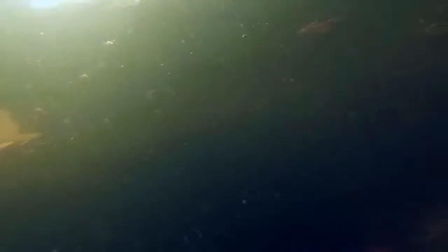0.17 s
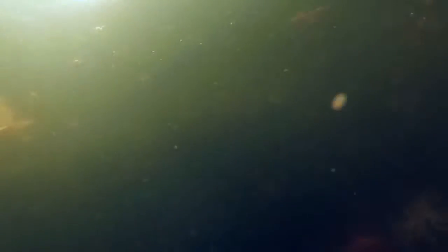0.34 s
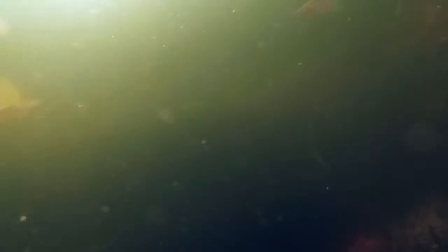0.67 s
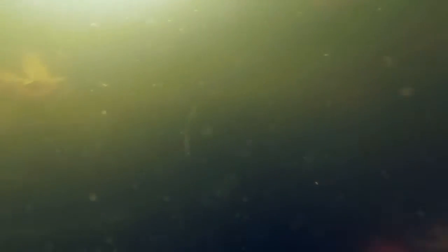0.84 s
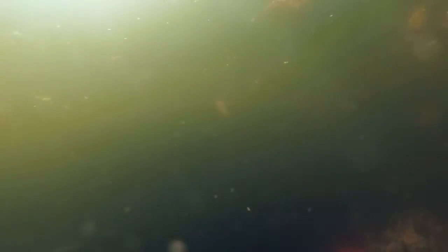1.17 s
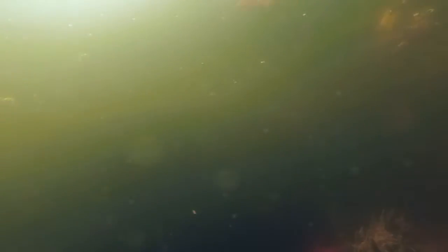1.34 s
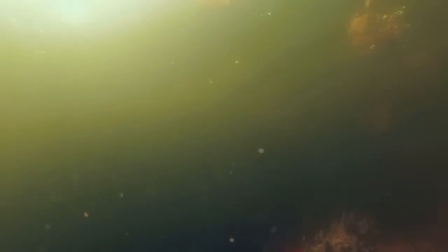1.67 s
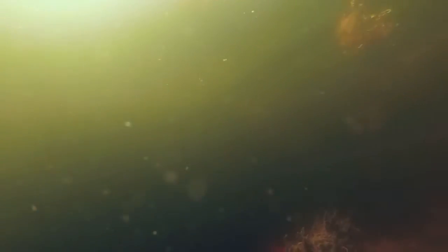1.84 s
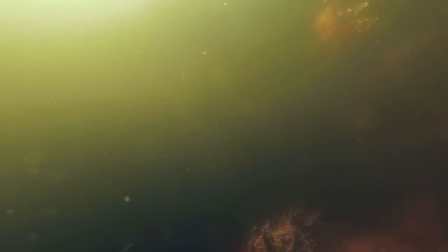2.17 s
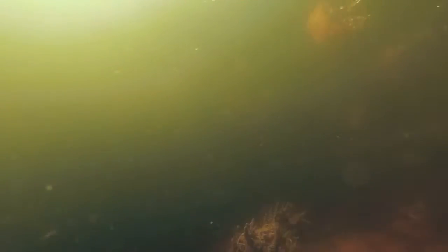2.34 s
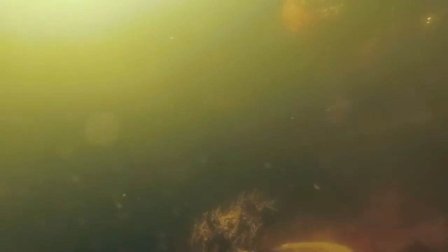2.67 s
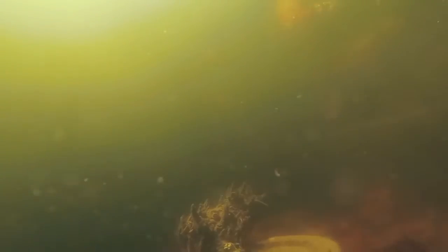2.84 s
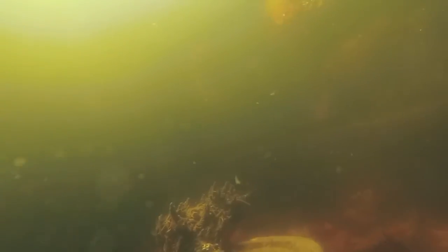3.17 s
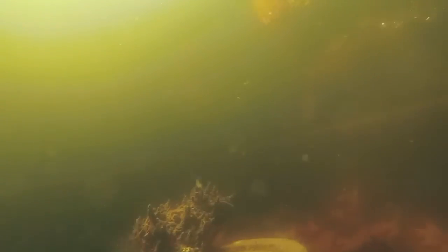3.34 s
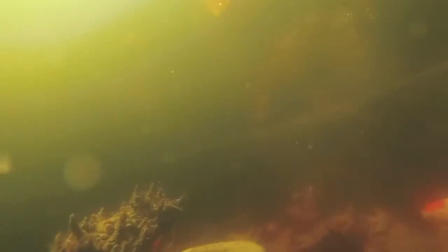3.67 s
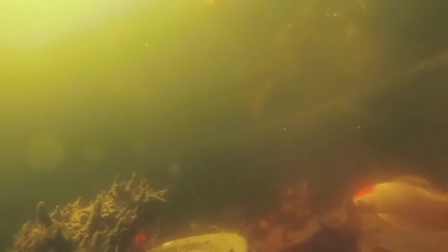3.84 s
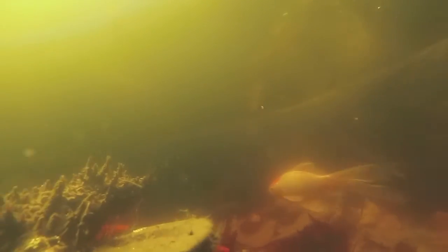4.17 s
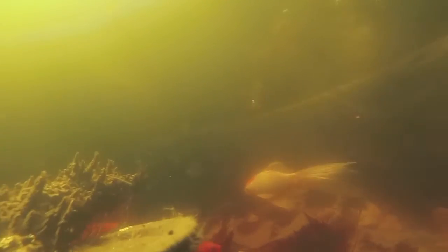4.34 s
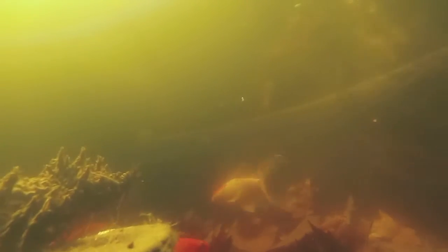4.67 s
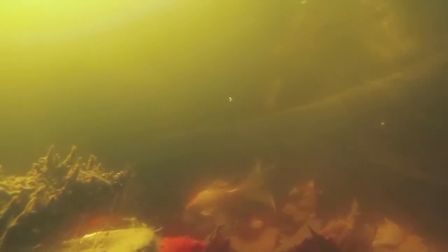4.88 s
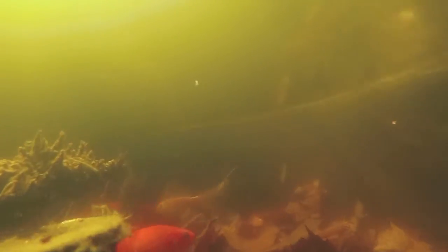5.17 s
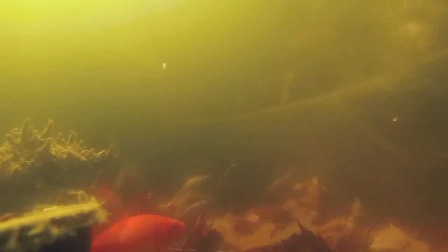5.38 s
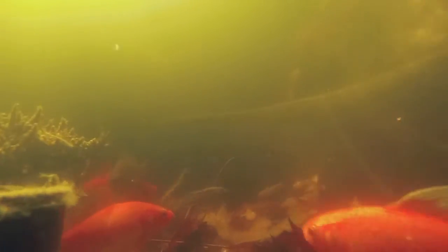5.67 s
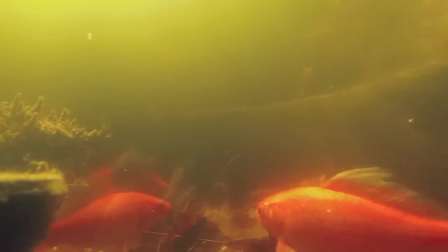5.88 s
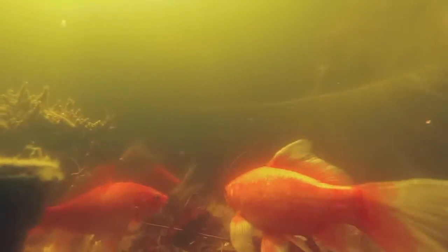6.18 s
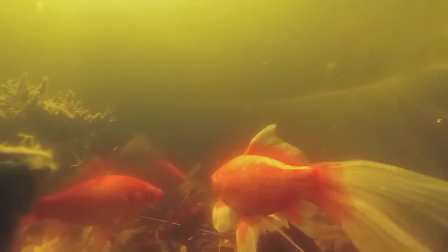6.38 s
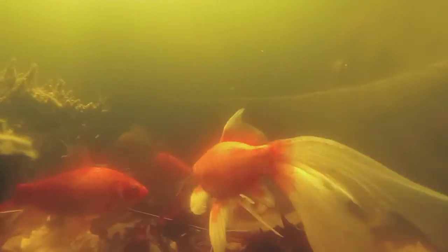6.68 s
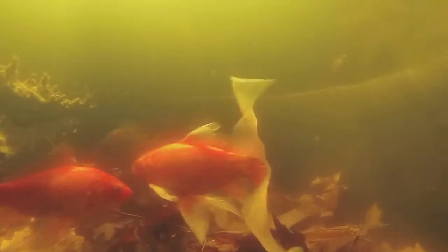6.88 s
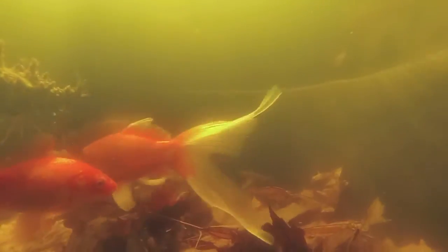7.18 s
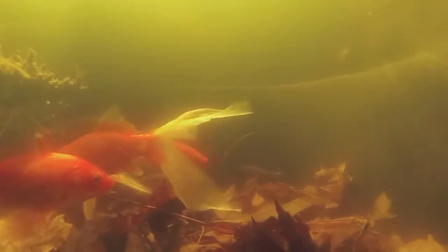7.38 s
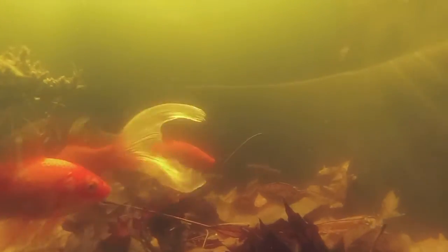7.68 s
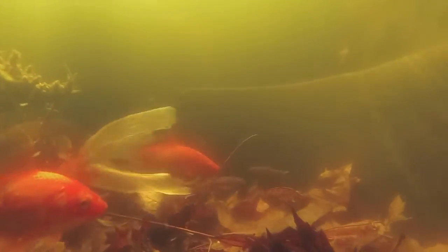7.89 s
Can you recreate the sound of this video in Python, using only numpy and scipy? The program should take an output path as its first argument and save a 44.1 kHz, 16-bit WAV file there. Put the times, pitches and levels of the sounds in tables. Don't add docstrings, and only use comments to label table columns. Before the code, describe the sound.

A microphone sealed inside a housing is lowered into a garden pond. From 0 to 1 second trapped air escapes in hollow mid-pitched glugs, low gulps and a stream of small bubbles, with a deep shuddering lurch around 0.8. The water settles into a muffled gurgle with fine crackle, low flow rumble and the steady hum of a mains pump buzzing the shell. A round pop comes at about 1.9. Near 3.0 the pole knocks heavily with a deep thump and gritty grinding; more knocks and a short bounce follow from 3.3 to 3.6, with a tiny snap between. Low surges pass around 3.9 to 4.4, with the hardest knock at 4.1. Weed drags and squeaks faintly at 4.6 to 4.9, and a last knock rings at 5.1. The hum then swells over sparse ticks, until weed brushes and a loose latch chatters lightly from 7.5 to 8.

```python
import sys
import numpy as np
from scipy import signal
from scipy.io import wavfile
from scipy.ndimage import uniform_filter1d

SR = 44100
rng = np.random.default_rng(int(sys.argv[2]) if len(sys.argv) > 2 else 0)


def transcribe(u):
    v = np.clip(np.atleast_2d(u).T, -1, 1)
    q = np.round(v * 32767).astype(np.int16)
    wavfile.write(sys.argv[1], SR, q)


def gain_from_db(level_db):
    decades = np.asarray(level_db, float) / 20
    return 10 ** decades


N = 353682


def unit(x):
    return x / np.sqrt(np.mean(x ** 2))


def read(rows):
    s, *columns = np.transpose(rows)
    return np.array([np.interp(np.arange(N) / SR, s, c) for c in columns])


def bandpass(x, order, low_hz, top_hz):
    return signal.sosfilt(signal.butter(order, [low_hz, top_hz], "band", fs=SR, output="sos"), x)


def modes(excite, table, order=2):
    out = 0
    for hz, width, db in table:
        mode = bandpass(excite(), order, hz - width / 2, hz + width / 2)
        out = out + gain_from_db(db) * unit(mode)
    return unit(out)


def walk(rate):
    k = int(SR / rate)
    held = np.repeat(rng.standard_normal(N // k + 1), k)
    return uniform_filter1d(uniform_filter1d(held, k), k)[:N]


def grains(per_s, spread_db):
    at = rng.random(1000)
    size = np.minimum(rng.exponential(size=1000), 2.6)
    keep = int(per_s * N / SR)
    out = np.zeros(N)
    out[(at[:keep] * N).astype(int)] = gain_from_db(spread_db * size[:keep])
    return unit(out)


def swell(rise, t60):
    rise, t60 = max(rise, 1 / SR), max(t60, 1e-3)
    t = np.arange(int((rise + t60) * SR)) / SR
    onset = np.sin(np.pi / 2 * np.minimum(t / rise, 1)) ** 2
    return t, onset * gain_from_db(-60 * np.maximum(t - rise, 0) / t60)


def add(out, s, x):
    i = int(s * SR)
    out[i:i + len(x)] += x[:N - i]


def ring(db, hz, rise, t60, glide=0.):
    t, env = swell(rise, t60)
    turns = hz * (t + glide * t ** 2 / (2 * t[-1]))
    return gain_from_db(db) * env * np.sin(2 * np.pi * turns)


def burst(db, rise, t60, low_hz, top_hz):
    env = swell(rise, t60)[1]
    n = len(env)
    grain_db = 3.5 * np.repeat(rng.standard_normal(n // 128 + 1), 128)[:n]
    grit = rng.standard_normal(n) * gain_from_db(grain_db)
    return gain_from_db(db) * env * unit(bandpass(grit, 3, low_hz, top_hz)) / 2


def duck():
    # (time [s], gain change [dB])
    loud_moments = [
        (0.821, -6),
        (.93, -5),
        (2.96, -10),
    ]
    attack_s, hold_s, recover_s = 0.055, 0.083, 0.39
    t = np.arange(N) / SR
    knees = np.cumsum([0, attack_s, hold_s, recover_s])
    return sum(np.interp(t - s, knees, [0, db, db, 0]) for s, db in loud_moments)


def rumble(depth):
    # (frequency [Hz], level [dB per Hz])
    spectrum = [(15, -8.5), (65, -10), (144, -15), (167, -18), (247, -20), (292, -37), (420, -40),
                (550, -64)]
    hump_hz, shallow_db, deep_db = 64.6, -5, 2
    hz_points, db_points = np.transpose(spectrum)
    out = 0
    for hz in 20 * 2 ** np.arange(0, 4.5, .5):
        db = np.interp(np.log(hz), np.log(hz_points), db_points)
        db = db + 10 * np.log10(hz)
        hump = np.exp(-(np.log2(hz / hump_hz) / 0.39) ** 2)
        db = db + (shallow_db + (deep_db - shallow_db) * depth) * hump
        band = modes(lambda: rng.standard_normal(N), [(hz, hz / 3, 0)])
        out = out + gain_from_db(db + 3.2 * walk(5.4)) * band
    start_db, grows_s = -5, 0.91
    level_db = -31.5 + start_db * np.maximum(1 - np.arange(N) / SR / grows_s, 0)
    return gain_from_db(level_db) * unit(out)


def pump(stir, depth):
    # (time [s], beat level [dB], 2nd multiple level [dB])
    main_lines = [(0.0, -35.5, -38.5), (0.4, -30.5, -34.5), (0.7, -32, -30), (0.95, -13.5, -28.5),
                  (1.15, -27.5, -34.5), (1.7, -26, -35.5), (2.1, -28, -34.5), (2.9, -25, -36.5),
                  (3.25, -23.5, -35), (3.65, -21.5, -41), (4.05, -25, -37.5), (4.5, -34.5, -31),
                  (5.0, -26, -32), (5.5, -19.5, -32), (6.2, -16.5, -36.5), (7.4, -19, -39),
                  (8.02, -22, -38.5)]
    # (multiple of the beat, index of line followed, level over it [dB])
    side_lines = [(2.5, 2, -7), (3.5, 2, -5), (4, 3, -1), (4.5, 3.5, -10.5), (6, 2.5, -13.5),
                  (6.5, 2.3, -18.5), (7.5, 2.6, -18.5)]
    beat_hz = 119.96
    third_db = -29.5 + 0.67 * stir - 12 * depth
    fifth_db = -28.5 + 0.84 * stir - 3.5 * depth
    odd_mains_db = -40.5 + 3 * depth
    db = [*read(main_lines), third_db, fifth_db, odd_mains_db]
    lines = list(zip((1, 2, 3, 5, 1.5), db))
    lines += [(k, db[int(line)] + rel_db) for k, line, rel_db in side_lines]
    phase = beat_hz * np.arange(N) / SR
    hum = 0
    for k, level_db in lines:
        lag = .45 * k ** 2
        hum = hum + gain_from_db(level_db + 1.05 * walk(25)) * np.cos(2 * np.pi * k * phase - lag)
    return np.sqrt(2) * hum, phase


def scrape():
    # (time [s], extra drive [dB], rise [s], hold [s], hiss level [dB])
    brushes = [
        (4.62, 4, 0.16, .08, -48.5),
        (7.5, 6.5, 0.041, .04, -59),
        (7.735, 5, 0.019, 0.028, -64),
        (7.8, 4, .02, .03, -64),
        (7.87, 4, .01, .03, -65),
        (7.917, 4, .008, 0.023, -62),
    ]
    release_s = .012
    t = np.arange(N) / SR
    leaves = unit(bandpass(rng.standard_normal(N), 5, 1000, 5300))
    drive_db, hiss_gain = 0, 0
    for s, extra_db, rise, hold, hiss_db in brushes:
        knees = np.cumsum([0, rise, hold, release_s + .6 * rise])
        shape = np.interp(t - s, knees, [0, 1, 1, 0])
        drive_db = drive_db + extra_db * shape
        hiss_gain = hiss_gain + gain_from_db(hiss_db) * shape
    return drive_db, hiss_gain * leaves * gain_from_db(4.0 * walk(90))


def water(phase, stir, depth):
    # (frequency [Hz], width [Hz], level [dB], extra level [dB per dB of stir])
    gurgle_modes = [(298, 152, -4.5, -0.09), (482, 110, -2, -0.19), (581.4, 92, -1.5, 0.1346),
                    (690, 144, -10.5, 0.25)]
    # (frequency [Hz], width [Hz], level [dB])
    shallow_modes = [(932, 230, -2.5), (1400, 320, -7), (1650, 346, -1.5), (2240, 162, 0.5),
                     (2395, 200, -5.5), (2834, 270, -8.5), (3165, 210, -9), (3585, 300, -14)]
    # (frequency [Hz], width [Hz], level [dB])
    deep_modes = [(1010, 460, -4), (1500, 880, -0.5), (2075, 450, -1.5), (2460, 130, -1.5),
                  (2780, 230, -2.5), (3150, 160, -6), (3610, 560, -4)]
    # (frequency [Hz], width [Hz], level [dB])
    fizz_modes = [(4000, 560, 1), (5050, 780, 1.5), (5800, 870, -3), (6850, 790, 0.5), (7730, 900, -6.5),
                  (9400, 1100, -5.5), (8500, 830, -14), (11000, 1600, -7), (13000, 2000, -11.5),
                  (14600, 1400, -14)]
    brush_db, hiss = scrape()
    stroke_strength = gain_from_db(3.7 * rng.standard_normal(int(phase[-1]) + 1))
    stroke = unit(stroke_strength[phase.astype(int)] * np.exp(-(phase % 1) / 0.31))
    ticks = grains(79, 5.0)

    def force(shake, shared, own, flicker_db):
        noise = rng.standard_normal(N) * gain_from_db(flicker_db * walk(35))
        return noise * (1 + shake * stroke) + shared * ticks + own * grains(30, 4.0)

    stirred_modes = [(hz, width, db + lean * (stir + 12)) for hz, width, db, lean in gurgle_modes]
    gurgle = modes(lambda: force(0.86, 0.063, .03, 1.3), stirred_modes)
    shallow = modes(lambda: force(1.4, 0.62, .15, 3.2), shallow_modes)
    deep = modes(lambda: force(0.38, 0.32, 0.17, 2.3), deep_modes)
    fizz = modes(lambda: force(0.42, 0.4, 0.6, 2.0), fizz_modes)
    rattle = np.sqrt(1 - depth) * shallow + np.sqrt(depth) * deep
    upper = signal.sosfiltfilt(signal.butter(3, 2100, "high", fs=SR, output="sos"), rattle)
    rattle = rattle + (gain_from_db(brush_db) - 1) * upper
    rattle_db = -38 + 0.4 * stir - 8.5 * depth
    fizz_db = -59.5 + 0.56 * brush_db
    return hiss + gain_from_db(-22 + stir) * gurgle + gain_from_db(rattle_db) * rattle + gain_from_db(fizz_db) * fizz


def surges():
    # (time [s], peak level [dB], frequency [Hz])
    pulses = [
        (.78, -22, 68),
        (2.929, -25, 72.6),
        (3.88, -19, 75.5),
        (4.02, -21, 63),
        (4.44, -22, 60.3),
        (5.85, -30, 55),
        (7.0, -30, 52),
    ]
    out = np.zeros(N)
    for s, db, hz in pulses:
        add(out, s, ring(db, hz, .05, 0.22, glide=-0.17))
    return out


def squeak():
    start_s, lasts_s = 4.82, .1
    out = np.zeros(N)
    for step in np.arange(0, lasts_s, .009):
        db = -46 + 3 * rng.standard_normal()
        hz = 1480 * (1 + 0.06 * rng.standard_normal())
        add(out, start_s + step, ring(db, hz, 0.0024, .03))
    return out


def latch():
    # (time [s], peak level [dB], frequency [Hz])
    strikes = [(7.529, -44, 2500), (7.543, -42, 2500), (7.558, -38, 2460), (7.718, -44, 2510),
               (7.751, -42, 2500), (7.758, -38, 2530), (7.768, -41, 2520), (7.776, -38, 2500),
               (7.808, -43, 2510), (7.8206, -41, 2500), (7.828, -41, 2490), (7.836, -42, 2500),
               (7.844, -44, 2510), (7.884, -40, 2490), (7.901, -42, 2500), (7.926, -37, 2440),
               (7.943, -36, 2470), (7.993, -45, 2480)]
    t60 = 0.024
    out = np.zeros(N)
    for s, db, hz in strikes:
        add(out, s, ring(db, hz, 0.0014, t60))
        add(out, s, burst(db - 4, .0015, .6 * t60, .85 * hz, 1.2 * 1.25 * hz))
    return out


def specks():
    # (time [s], peak level [dB], frequency [Hz])
    tick_events = [(0.0268, -33.5, 5740), (0.2094, -37.5, 7000), (0.3551, -39, 5410), (0.3716, -40, 5440),
                   (0.4599, -39, 6700), (0.4783, -43, 6070), (0.6454, -43, 5320), (0.7342, -37.5, 5460),
                   (0.8939, -45, 5400), (0.9577, -38, 5700), (1.0565, -45, 5200), (1.5155, -39, 5550),
                   (1.555, -42, 5520), (1.6551, -39, 6640), (1.7554, -43, 6500), (2.0133, -43, 6870),
                   (2.2383, -43, 6840), (2.395, -42, 6570), (2.587, -37, 7530), (2.7621, -38, 6640),
                   (2.8963, -42, 6840), (3.5073, -46, 6780), (3.5327, -45, 6760), (3.8415, -47, 6850),
                   (3.9418, -45, 6520), (3.9642, -46, 5550), (4.1967, -45, 5810), (4.4646, -47, 6770),
                   (4.4845, -37, 6600), (4.5414, -39, 6740), (4.5788, -36, 7610), (4.6332, -43, 6590),
                   (4.715, -45, 5430), (4.7869, -46, 5740), (4.958, -43, 7100), (5.0647, -48, 5200),
                   (5.3945, -45, 7480), (5.4858, -44, 6990), (5.5476, -44, 7060), (5.5925, -45, 6800),
                   (5.9153, -40, 5560), (5.9492, -45, 6290), (6.031, -44, 5300), (6.2929, -43, 5520),
                   (6.3393, -40, 10800), (6.4576, -45, 7190), (6.716, -46, 7180), (6.8592, -47, 5770),
                   (6.8906, -43, 6880), (7.0816, -44, 7180), (7.1919, -44, 6570), (7.3431, -43, 5200),
                   (7.382, -47, 6690), (7.5401, -41, 6660), (7.5571, -40, 6790), (7.7491, -44, 6760),
                   (7.7661, -39, 7260), (7.821, -38, 7680), (7.9153, -43, 7240), (7.9402, -43, 6970)]
    out = np.zeros(N)
    for s, db, hz in tick_events:
        add(out, s, burst(db - 1.0, 0.0026, .012, .9 * hz, 1.12 * hz))
    return out


def wallow():
    # (time [s], peak level [dB], rise [s], t60 [s])
    jolts = [
        (0.0, -31, .08, 2.5),
        (.29, -28, 0.07, 0.87),
        (.74, -21, 0.05, .4),
        (0.801, -6.5, 0.085, 1.4),
        (1.4, -32, 0.024, .8),
        (2.95, -19.5, 0.047, .45),
        (3.25, -27, 0.18, 0.73),
        (3.57, -25, 0.055, 1.8),
    ]
    # (time [s], frequency [Hz])
    swing_rate = [(.9, 22.2), (.97, 26)]
    drag_s, crest_s = .33, .881
    size = np.zeros(N)
    for s, db, rise, t60 in jolts:
        since, env = swell(rise, t60)
        add(size, s, gain_from_db(db) * env * np.exp(-(since / drag_s) ** 4))
    turns = np.cumsum(read(swing_rate)[0]) / SR
    angle = 2 * np.pi * (turns - turns[int(crest_s * SR)]) + np.pi / 2 + .15 * walk(12)
    swing = np.sin(angle) - .15 * np.cos(2 * angle) - 0.11 * np.sin(3 * angle)
    return np.sqrt(2) * size * swing


def grinding():
    # (time [s], peak level [dB], t60 [s], low edge [Hz], top edge [Hz])
    cracks = [(2.96, -13, 0.042, 900, 2000), (2.972, -9, 0.028, 700, 2400), (3.021, -51, 0.048, 1500, 4000),
              (3.06, -36, 0.014, 1100, 2200), (3.07, -33, 0.041, 700, 1900), (3.104, -31, .045, 700, 2600),
              (3.105, -38, .04, 2600, 6500), (0.025, -23, 0.019, 1900, 3900),
              (1.052, -28, .022, 1200, 3000), (1.054, -45, .018, 3000, 6200), (.734, -37, .016, 3500, 7000),
              (0.84, -32, 0.06, 910, 3480), (1.883, -32, .06, 930, 2700), (6.031, -35, .015, 2200, 5000),
              (2.587, -37, 0.027, 1200, 1800), (2.62, -29, 0.027, 780, 2000)]
    # (time [s], peak level [dB], rise [s], low edge [Hz], top edge [Hz])
    rubs = [(2.958, -22.5, 0.02, 2200, 5400), (2.959, -30, 0.024, 6700, 14000),
            (0.3, -28.5, .11, 760, 2350), (0.74, -33.5, 0.046, 2000, 3050), (0.8, -31.5, 0.024, 1400, 3300),
            (3.6, -30, 0.035, 650, 850), (4.061, -25.5, 0.011, 260, 410), (4.1, -35, 0.017, 1200, 1300),
            (3.3, -37, .02, 1700, 2430), (4.1, -30, 0.0092, 1800, 3600), (.918, -36, .01, 2400, 3700),
            (.985, -38, .015, 2400, 3700), (3.018, -52, .004, 4500, 7000), (3.06, -47, .004, 4000, 7000)]
    out = np.zeros(N)
    for s, db, t60, *band in cracks:
        add(out, s, burst(db, 0.17 * t60, t60, *band))
    for s, db, rise, *band in rubs:
        add(out, s, burst(db, rise, 1.1 * rise, *band))
    snap_s, snap_db, snap_decay_s = 3.4366, -19, .00007
    add(out, snap_s, -gain_from_db(snap_db) * np.exp(-np.arange(100) / SR / snap_decay_s))
    return out


def pole():
    # (time [s], peak level [dB], frequency [Hz], thump level [dB], upper ring level [dB])
    knocks = [
        (2.962, -11.5, 617, 3.5, -8),
        (3.106, -21.5, 596, -5, -10),
        (3.312, -10.5, 577, -5.5, -29),
        (3.515, -18, 621, -27, -15),
        (3.589, -14, 584, -6, -36),
        (3.604, -17, 605, -8, -40),
        (3.619, -21, 600, -12, -40),
        (3.644, -24, 590, 4, -32),
        (4.0632, -5, 605, -36, -20),
        (5.072, -10, 604, -26, -12.5),
    ]
    # (frequency [Hz], level [dB], t60 [s])
    thump_modes = [(148.8, 2.5, 0.43), (203.4, -2, 0.092), (293, -4, 0.18)]
    # (frequency [Hz], level [dB], t60 [s])
    upper_modes = [(1225, -6.5, .03), (1473, 6.5, 0.026), (2330, -7, 0.025), (2690, -6, 0.022)]
    t60 = 0.07
    out = np.zeros(N)
    for s, db, hz, thump_db, upper_db in knocks:
        add(out, s, ring(db - 3.0, hz, 0.0038, t60))
        add(out, s, ring(db - 14.5, 1.24 * hz, 0.0037, 1.23 * t60))
        for table, rel_db in ((thump_modes, thump_db), (upper_modes, upper_db)):
            for mode_hz, mode_db, mode_t60 in table:
                struck_hz = mode_hz * (1 + 0.0091 * rng.standard_normal())
                add(out, s, ring(db + rel_db + mode_db - 5.0, struck_hz, 0.0022, mode_t60))
    return out


def swarm():
    ends_s, low_hz, octaves = 1.0, 1000, 2.4
    out = np.zeros(N)
    for when, pitch, size in rng.random((90, 3)):
        hz = low_hz * 2 ** (octaves * pitch)
        db = -33.5 - 5 * octaves * pitch - 2.5 * np.log(size + .1)
        add(out, when * ends_s, ring(db, hz, 0.00046, 11 / hz, glide=.12))
    return out


def bubbles():
    # (time [s], peak level [dB],
    # frequency [Hz])
    short_rings = [(.01, -25.5, 3360), (0.026, -18.5, 1400), (.028, -24, 2100), (.083, -23, 1650),
                   (0.134, -20.5, 1690), (0.164, -21.5, 1400), (.208, -21.5, 1260), (0.356, -23, 1500),
                   (0.396, -27, 2360), (.538, -33, 2970), (0.644, -25, 2310), (.706, -8, 1650),
                   (0.735, -32.5, 4500), (0.772, -28, 1990), (0.844, -25, 1650), (1.0533, -21.5, 2130),
                   (1.057, -43, 4080), (1.077, -29, 1820), (1.883, -38, 1650), (2.973, -20, 1900),
                   (2.975, -20, 2160), (2.961, -21, 1400), (2.974, -21, 1050), (2.966, -25, 2900),
                   (4.141, -22.5, 2980), (4.142, -26.5, 1560), (4.145, -27.5, 2350), (4.485, -34.5, 2530),
                   (4.915, -38, 1560), (5.37, -39, 2500), (6.083, -40, 3800), (6.29, -46, 4200),
                   (6.332, -41.5, 4000)]
    rise, t60 = 0.0015, 0.023
    out = np.zeros(N)
    for s, db, hz in short_rings:
        add(out, s, ring(db, hz, rise, t60, glide=0.058))
        add(out, s, ring(db - 7.5, 0.65 * hz, rise / 2, t60 / 2))
        add(out, s, burst(db - 9.5, 0.0009, 0.022, 0.59 * hz, 1.38 * hz))
    return out


def air():
    # (time [s], peak level [dB], frequency [Hz], rise [s])
    pockets = [(.132, -18.5, 557, 0.016), (.158, -15, 600, 0.0096), (.222, -22, 597, 0.012),
               (.392, -15, 602, 0.026), (.262, -6.5, 598, 0.011), (.312, -18, 589, .008),
               (.36, -13, 584, 0.019), (.484, -16.5, 576, 0.026), (.529, -18.5, 591, 0.0099),
               (.605, -16, 565, 0.0082), (4.446, -31, 540, 0.0044), (5.216, -35, 500, .004),
               (5.512, -35, 597, 0.0046), (6.062, -31, 617, .005), (.635, -15.5, 568, 0.013),
               (.804, -5, 698.6, 0.027), (.911, -12, 705, .014), (.808, -17, 560, .022),
               (.964, -6, 695, .024), (.995, -24, 1120, .012), (1.012, -21, 1316, 0.008),
               (.81, -29, 1350, 0.0086)]
    # (time [s], peak level [dB], octave level [dB], t60 [s])
    gulps = [
        (0.599, -17, -41, 0.12),
        (.635, -15, -31, 0.11),
        (.745, -12.5, -16, .09),
        (.802, -15, -15.5, 0.39),
        (.97, -28, -19, 0.21),
    ]
    # (time [s], peak level [dB], frequency [Hz], t60 [s])
    pops = [
        (1.86, -8, 360, 0.012),
        (1.882, -10, 345, 0.061),
        (1.884, -17.5, 690, 0.08),
        (1.893, -16.5, 510, 0.061),
        (2.962, -1.5, 170, 0.027),
        (3.824, -27, 4000, .025),
    ]
    tones = [(s, db, hz, rise, 24.5 / hz + 2.2 * rise) for s, db, hz, rise in pockets]
    tones += [(s, db, hz, 0.0028, t60) for s, db, hz, t60 in pops]
    gulp_rise = 0.012
    for s, db, octave_db, t60 in gulps:
        tones.append((s, db, 151.5, gulp_rise, t60))
        tones.append((s, octave_db, 301.5, 1.1 * gulp_rise, 0.87 * t60))
    out = np.zeros(N)
    for s, db, hz, rise, t60 in tones:
        add(out, s, ring(db, hz, rise, t60, glide=0.031))
        add(out, s, ring(db - 23, 1.46 * hz, rise, t60, glide=0.04))
        add(out, s, burst(db - 11.5, rise, 1.6 * t60, .88 * hz, 1.15 * hz))
    return out


def scene():
    # (time [s], level [dB])
    stir_curve = [(0.0, -4.5), (0.3, 0), (0.8, -3), (0.98, 4.5), (1.1, -3.5), (1.5, -8.5), (2.2, -13.5),
                  (2.9, -13.5), (3.3, -19), (3.6, -19), (4.3, -18), (4.8, -16.5), (5.3, -17), (5.8, -17),
                  (6.9, -19.5), (7.6, -20.5), (8.02, -19)]
    # (time [s], depth [0-1])
    sink_curve = [(3.0, 0.03), (4.4, 0.52), (5.6, 0.95)]
    stir = read(stir_curve)[0]
    depth = np.clip(read(sink_curve)[0], 0, 1)
    hum, phase = pump(stir, depth)
    steady = rumble(depth) + hum + water(phase, stir, depth)
    touches = surges() + squeak() + latch() + specks()
    housing = wallow() + grinding() + pole()
    escaping = swarm() + bubbles() + air()
    return (gain_from_db(duck()) * steady + touches + housing + escaping)[None]


def top_cut(x):
    return signal.sosfilt(signal.butter(12, 16410, fs=SR, output="sos"), x)


def record(dry):
    dull = signal.sosfilt(signal.butter(12, 15800, fs=SR, output="sos"), dry)
    dull = np.clip(dull, -1.5, 1.5)
    mix = dull - 4 / 27 * dull ** 3
    return top_cut(mix)


dry = scene()
out = record(dry)
transcribe(out)
```